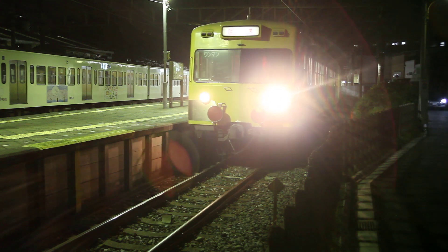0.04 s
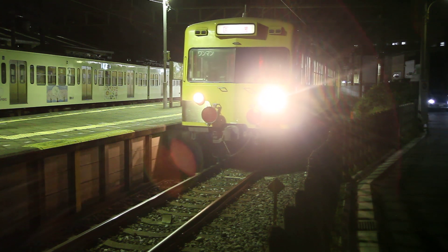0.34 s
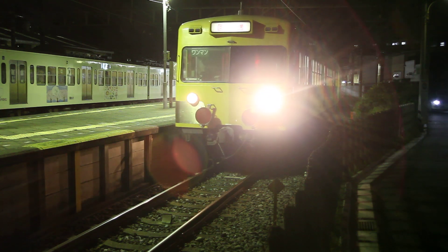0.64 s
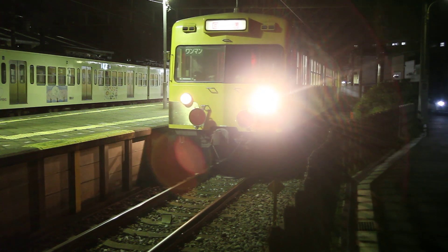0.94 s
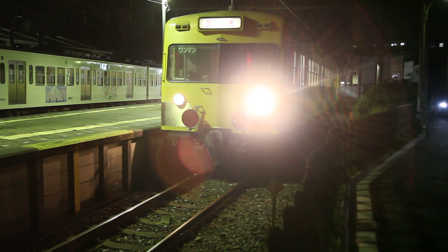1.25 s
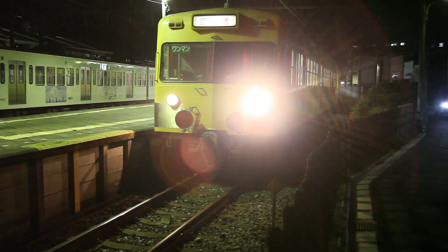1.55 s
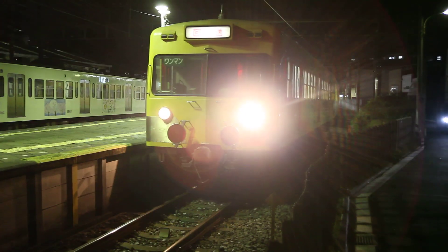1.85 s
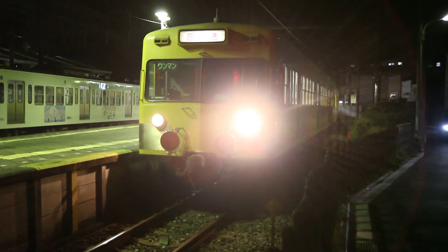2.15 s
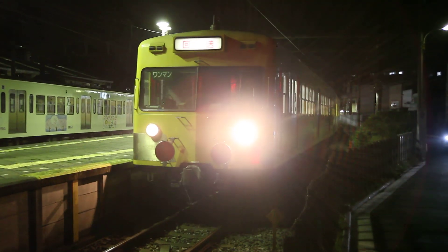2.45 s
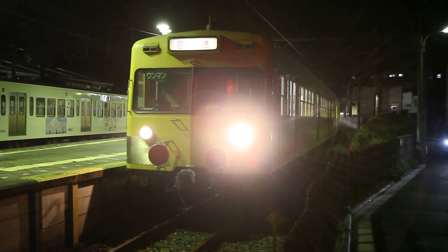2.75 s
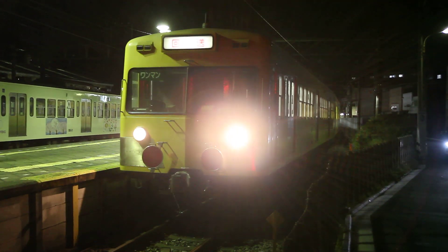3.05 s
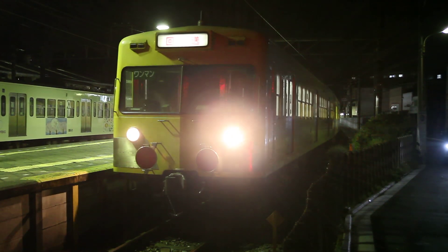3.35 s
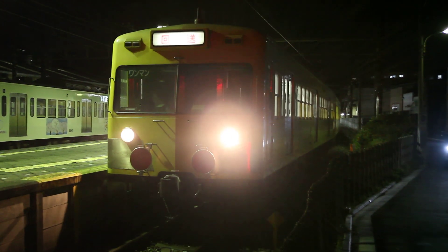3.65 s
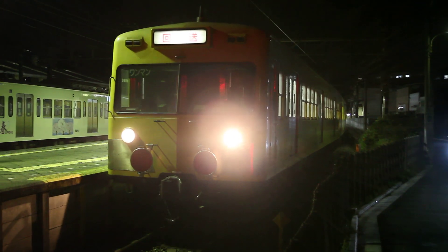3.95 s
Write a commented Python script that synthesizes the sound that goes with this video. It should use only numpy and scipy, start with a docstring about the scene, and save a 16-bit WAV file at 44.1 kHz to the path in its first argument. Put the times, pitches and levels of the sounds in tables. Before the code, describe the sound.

Loud air hiss bursts three times from an electric train rolling slowly beside a platform, sometimes with a breathy whistle, each burst leaving a tail in the station. A low rumble continues beneath, and the running gear knocks once.

```python
"""A brake valve lets out three long bursts of air as an electric train creeps along a platform at night.
The rushing air hisses through an exhaust pipe and now and then sings on one note. Before and after a
burst the nearly shut valve leaks with a thin whistle, and a tail of hiss hangs in the station.
Wheels rumble, the drive drones, a low buffeting comes and goes, and the running gear knocks once."""
import sys
import numpy as np
from scipy import signal
from scipy.fft import rfft, irfft
from scipy.io import wavfile

SR = 44100
rng = np.random.default_rng(int(sys.argv[2]) if len(sys.argv) > 2 else 0)


def transcribe(signal):
    """Save signal, clipped to [-1, 1], as a 16-bit WAV file at the path in sys.argv[1]."""
    frames = np.atleast_2d(signal).T
    limited = np.clip(frames, -1, 1)
    pcm = np.round(limited * 32767).astype(np.int16)
    wavfile.write(sys.argv[1], SR, pcm)


N = 176400


def from_db(db):
    """Turn decibels into a gain to multiply by."""
    return 10 ** (np.asarray(db) / 20)


def rms_one(x):
    """Scale a signal to an average power of 1."""
    return x / np.sqrt(np.mean(x ** 2) + 1e-20)


def seconds():
    """The time of every sample."""
    return np.arange(N) / SR


def bins():
    """The frequencies of the spectrum in Hz."""
    return np.maximum(np.arange(N // 2 + 1) * SR / N, 1)


def in_time(rows):
    """A gain that follows rows of seconds and dB."""
    return from_db(np.interp(seconds(), *np.transpose(rows)))


def at_hz(points, hz):
    """Read between a table's rows, with octaves evenly spaced."""
    f, value = np.transpose(points)
    return np.interp(np.log(hz), np.log(f), value)


def ramp(start, length):
    """Rise from 0 to 1."""
    return np.clip((seconds() - start) / max(length, 1 / SR), 0, 1)


def window(start, end, edge_s):
    """Fade in, hold, fade out."""
    return ramp(start - edge_s / 2, edge_s) * (1 - ramp(end - edge_s / 2, edge_s))


def drift(rate_hz):
    """A random wobble of typical size 1, mostly slower than rate_hz."""
    return rms_one(irfft(rfft(rng.standard_normal(N)) / (1 + (bins() / rate_hz) ** 2), N))


def noise(gain):
    """Noise of power 1, shaped by a gain for each frequency."""
    return rms_one(irfft(rfft(rng.standard_normal(N)) * gain, N))


def colour(points):
    """A gain for each frequency, from rows of Hz and dB."""
    return from_db(at_hz(points, bins()))


def bell(hz, width_hz):
    """The shape of a resonance: a peak of height 1."""
    return 1 / (1 + (2 * (bins() - hz) / width_hz) ** 2)


def reflections(share=0.26, spread_s=.016, count=40):
    """Echoes from the car body, track stones and platform wall put fine ripples in a spectrum."""
    echoes = np.zeros(N)
    strengths = rng.standard_normal(count)
    delays = ((.002 + rng.random(count) * spread_s) * SR).astype(int)
    echoes[delays] = strengths
    return 1 + share * rfft(echoes) / np.sqrt(np.sum(echoes ** 2))


def wheels():
    """Wheels rumble as they roll on the rails."""
    # The rumble's tone. Each row: frequency in Hz, relative level in dB.
    tone = [(20, -18), (40, 4), (110, -3.5), (220, 3), (320, -1.5), (600, -3.5), (850, -2), (1200, 0),
            (1500, -3.5), (1750, -5.5), (2600, -16), (5000, -11), (12000, -60)]
    # Its loudness. Each row: time in seconds, level in dB.
    levels = [(0, -44.5), (.35, -40), (1.1, -41.5), (1.25, -39), (2.1, -38.5), (3.0, -39), (3.4, -39),
              (4, -40.5)]
    return in_time(levels) * noise(colour(tone) * reflections())


def drive():
    """The electric drive gives a low, wavering drone."""
    # The drone's loudness. Each row: time in seconds, level in dB.
    levels = [(0, -45), (.45, -52), (.9, -49), (1.08, -51), (1.24, -48), (1.55, -52), (2.0, -49),
              (2.15, -44.5), (2.3, -51), (2.6, -44.5), (2.9, -42), (3.02, -51), (3.5, -51), (4, -50.5)]
    return in_time(levels) * noise(bell(hz=170, width_hz=34))


def buffeting():
    """A deep, lumpy noise comes and goes."""
    # Its tone. Each row: frequency in Hz, relative level in dB.
    tone = [(18, -8), (38, 4.5), (70, 4), (110, 1.5), (200, -11.5), (400, -25), (3000, -80)]
    # Its loudness. Each row: time in seconds, level in dB.
    levels = [(0, -50), (.25, -44), (.5, -39.5), (.78, -39.5), (.86, -52), (1.15, -49), (1.25, -43),
              (1.6, -52), (1.76, -41), (1.95, -70), (2.15, -45), (2.27, -54), (2.45, -46), (2.95, -44),
              (3.2, -55), (3.68, -66), (3.77, -41), (3.88, -61)]
    deep_noise = noise(colour(tone))
    lumps = from_db(2.5 * drift(rate_hz=14))
    return in_time(levels) * rms_one(deep_noise * lumps)


def station(flow, steady_db=-38.5, tail_db=-19, fade_60_db_s=2.7):
    """Hiss hangs in the station: a steady bed, and a tail that builds and dies with each burst."""
    # The hiss's tone. Each row: frequency in Hz, relative level in dB.
    tone = [(100, -42), (1500, -11.5), (2000, -4.5), (3200, -6), (5000, 0), (6300, 2), (7800, 1.5),
            (10000, -6.5), (12000, -17), (14000, -23), (15600, -27)]
    power_kept = from_db(-60 / (fade_60_db_s * SR)) ** 2
    tail_power = signal.lfilter([1 - power_kept], [1, -power_kept], flow ** 2)
    level = np.sqrt(from_db(steady_db) ** 2 + from_db(tail_db) ** 2 * tail_power)
    return level * noise(colour(tone) * reflections())


def leaks():
    """Air squeezes through the nearly shut valve with a thin hiss and a breathy whistle."""
    # The leaks. Each row: start and end in seconds, hiss in dB, whistle pitch in Hz, whistle in dB.
    escapes = [(0.04, 0.115, -38, 7600, -42), (1.06, 1.168, -47, 8150, -36), (1.428, 1.536, -35, 7600, -42),
               (2.70, 2.79, -38, 7500, -44), (2.773, 2.83, -31.5, 7520, -33), (2.83, 2.89, -36, 7400, -42),
               (3.054, 3.09, -35, 7350, -34)]
    # The hiss's tone. Each row: frequency in Hz, relative level in dB.
    tone = [(300, -39), (1800, -1.5), (3500, -4), (5000, 6.5), (6100, 8.5), (7600, 9), (9000, -11),
            (11000, -10), (13500, -28), (15500, -33)]
    hiss, out = noise(colour(tone) * reflections()), 0
    for start, end, hiss_db, hz, whistle_db in escapes:
        whistle = from_db(whistle_db) * noise(bell(hz, width_hz=380))
        out += window(start, end, edge_s=.03) * (from_db(hiss_db) * hiss + whistle)
    return out


def valve(creep_db=-11, settle_s=0.12):
    """The valve creeps open, blows and shuts. Gives the air flow and how far the hiss broadens in dB."""
    # The bursts. Each row: opening and shutting times in seconds, level in dB, rise in seconds,
    # early shortfall in dB, final fade in dB per second, creep length in seconds,
    # start and end of the broader hiss in seconds, broadening in dB.
    bursts = [(0.091, 1.021, -21, 0.032, 3.5, 158, .04, 0.33, 1.03, 1.5),
              (1.5, 2.653, -19, 0.045, 5.5, 160, .11, 1.74, 2.5, 2.7),
              (3.072, 3.983, -18.5, 0.024, 1.3, 140, .025, 3.25, 3.83, 4.0)]
    t, flow, broad_db = seconds(), 0, 0
    crack = from_db(creep_db)
    for opens, shuts, db, rise, short_db, fade, creep, broad_from, broad_until, wide_db in bursts:
        opening = crack * ramp(opens - creep, creep) + (1 - crack) * ramp(opens, rise)
        settling_db = short_db * np.exp(-np.maximum(t - opens, 0) / settle_s)
        closing_db = fade * np.maximum(t - shuts, 0)
        flow += opening * from_db(db - settling_db - closing_db)
        broad_db += wide_db * window(broad_from, broad_until, edge_s=0.11)
    return flow, broad_db


def shifting_echoes(x, share=0.42, spread_s=.008, count=24):
    """Nearby echoes fade in and out as the train moves, so the tone wanders."""
    delays = ((.001 + rng.random(count) * spread_s) * SR).astype(int)
    echoes = sum(drift(rate_hz=1.9) * np.roll(x, delay) for delay in delays)
    return x + share / np.sqrt(count) * echoes


def jet(flow, broad_db, flicker_db=0.96, sputter_db=0.43):
    """Swirling air rushes through the pipe; each band flickers alone and the whole jet sputters."""
    # The jet's tone. Each row: frequency in Hz, relative level in dB.
    tone = [(200, -42), (900, -34), (1400, -23), (1690, -25.5), (1920, -10), (2400, -14), (3000, -11),
            (4000, -5.5), (5200, -1), (6400, -0.5), (7900, 2), (8700, -3), (9600, -8.5), (11000, -10.5),
            (12200, -21), (14000, -25.5), (15600, -24)]
    # The exhaust pipe's resonances. Each row: frequency in Hz, width in Hz, boost or cut in dB.
    resonances = [(2086, 31, 1.5), (3060, 50, 1), (3170, 39, -0.5), (3640, 60, -2), (4340, 230, -0.5),
                  (4840, 79, -3), (5270, 72, 2), (5900, 43, 4.5), (6240, 90, 3.5), (6690, 89, 1.5),
                  (7316, 50, -3.5), (7900, 62, -4.5)]
    # Where the hiss broadens. Each row: frequency in Hz, share of broad_db (below 0 it cuts).
    broadening = [(1500, 0.93), (2100, 0.37), (3400, 1.03), (4800, -0.11), (6000, -0.33), (7800, -0.64),
                  (10000, 0.11), (13500, 1.2), (15500, .8)]
    pipe = from_db(sum(db * bell(hz, width) for hz, width, db in resonances))
    air = noise(colour(tone) * pipe * reflections())
    spectrum = rfft(rms_one(shifting_echoes(air)))
    centres_hz = np.geomspace(1200, 15000, 16)
    out = 0
    for hz, only_this_band in zip(centres_hz, np.eye(len(centres_hz))):
        band = irfft(spectrum * np.interp(bins(), centres_hz, only_this_band), N)
        out += band * from_db(broad_db * at_hz(broadening, hz) + flicker_db * drift(rate_hz=11))
    return out * flow * from_db(sputter_db * drift(rate_hz=110))


def singing():
    """The jet briefly sings on a resonance, making a breathy note."""
    # The notes. Each row: start and end in seconds, pitch in Hz, level in dB.
    notes = [(.14, .4, 5280, -35), (.5, 1.0, 7660, -35), (2.14, 2.362, 4400, -31), (2.2, 2.56, 6200, -32.5),
             (3.086, 3.623, 4000, -35), (3.18, 3.55, 3210, -45)]
    return sum(window(start, end, edge_s=0.068) * from_db(db) * noise(bell(hz, width_hz=130))
               for start, end, hz, db in notes)


def bump():
    """A dull bump comes just before the knock."""
    # The bump: its middle and length in seconds, pitch and width in Hz, level in dB.
    thud = (1.235, .035, 202, 60, -37)
    middle, length, hz, width_hz, db = thud
    swell = window(middle - length / 2, middle + length / 2, edge_s=length / 2)
    return from_db(db) * swell * noise(bell(hz, width_hz))


def knock():
    """Something hard on the running gear strikes, chatters and rings briefly."""
    # The quick contacts of one knock. Each row: start in seconds, strength in dB.
    contacts = [(1.2527, -17), (1.2535, 2.5), (1.2556, -6.5)]
    # The ringing tones. Each row: pitch in Hz, relative level in dB, seconds to fade by 60 dB.
    tones = [(511, -30.5, 0.028), (1280, -40, .01), (1940, -42, 0.011), (2110, -17.5, 0.013),
             (2350, -24.5, 0.02), (3100, -28, 0.0086), (3740, -37, .012), (4140, -23.5, 0.011),
             (5400, -25, .012), (6944, -30, .008)]
    t = np.arange(SR // 5) / SR
    ring, out = 0, np.zeros(N)
    for k, (hz, db, fade_s) in enumerate(tones):
        direction = (-1) ** (k // 3)   # flips after every three tones
        ring += direction * from_db(db - 60 * t / fade_s) * np.sin(2 * np.pi * hz * t)
    for start, db in contacts:
        first = int(start * SR)
        out[first:first + len(t)] += from_db(db) * ring
    return out


def scene():
    """Add the air and the train's other sounds, the same in both channels."""
    flow, broad_db = valve()
    air = jet(flow, broad_db) + singing() + leaks() + station(flow)
    mono = air + wheels() + drive() + buffeting() + bump() + knock()
    return np.stack([mono, mono])


def record(dry):
    """Cut off the highest treble steeply."""
    cutoff_hz = 15750
    return signal.sosfilt(signal.ellip(12, .1, 80, cutoff_hz, fs=SR, output="sos"), dry)


dry = scene()
out = record(dry)
transcribe(out)
```